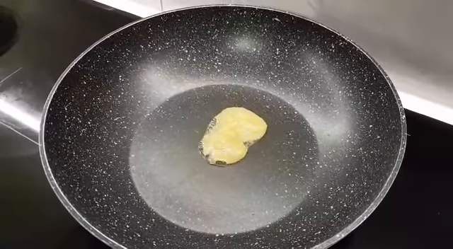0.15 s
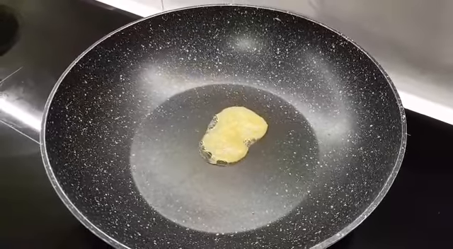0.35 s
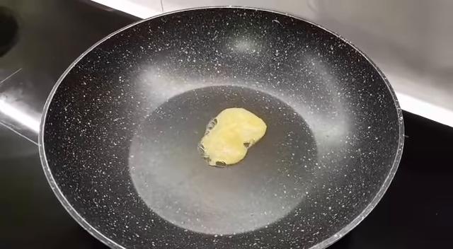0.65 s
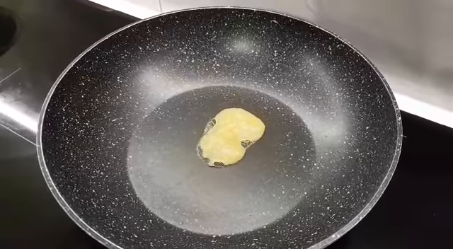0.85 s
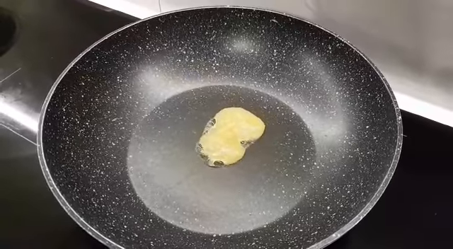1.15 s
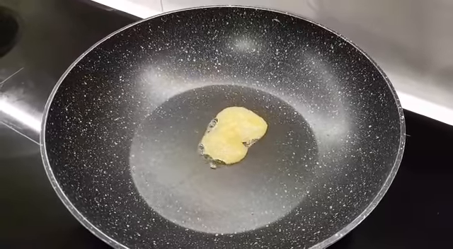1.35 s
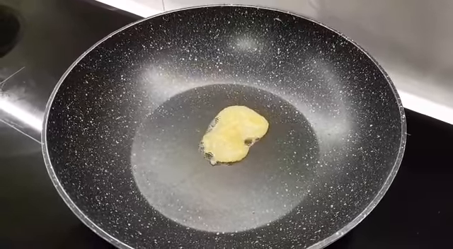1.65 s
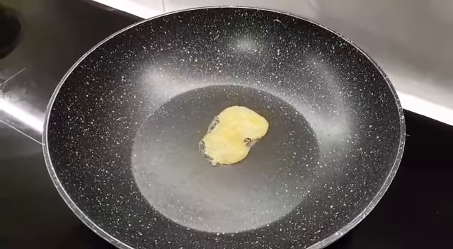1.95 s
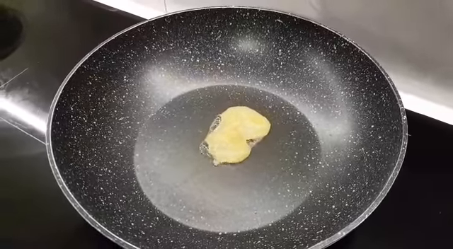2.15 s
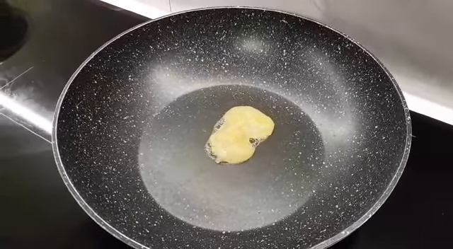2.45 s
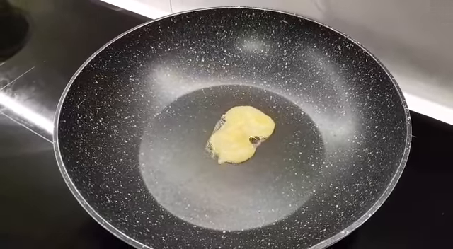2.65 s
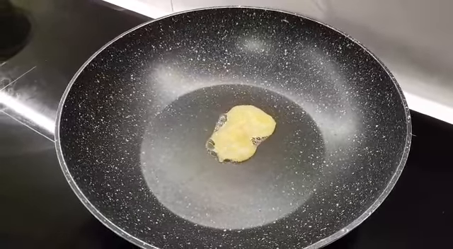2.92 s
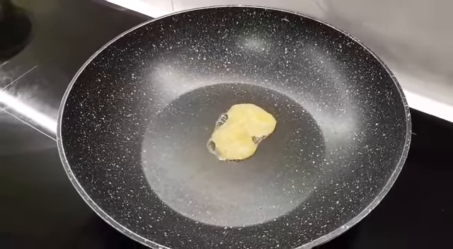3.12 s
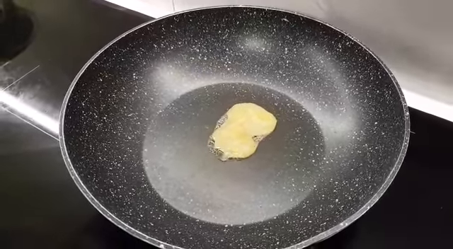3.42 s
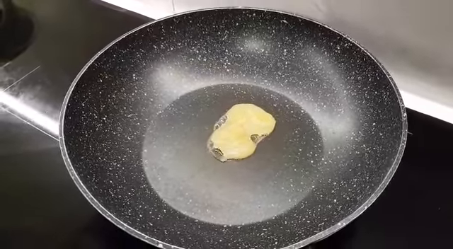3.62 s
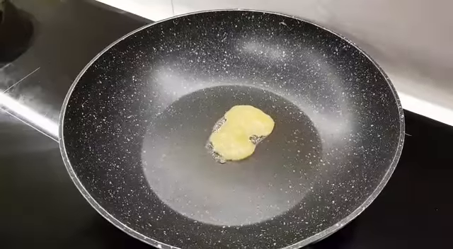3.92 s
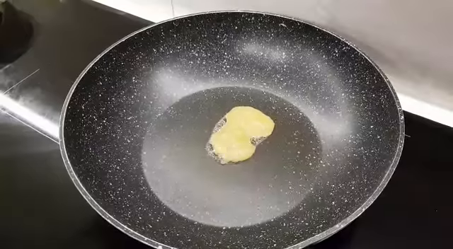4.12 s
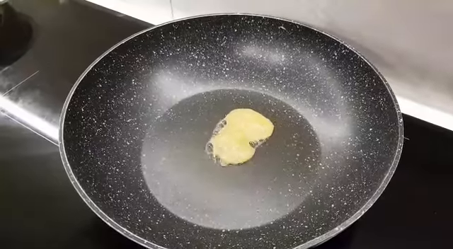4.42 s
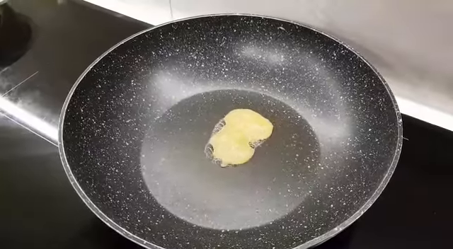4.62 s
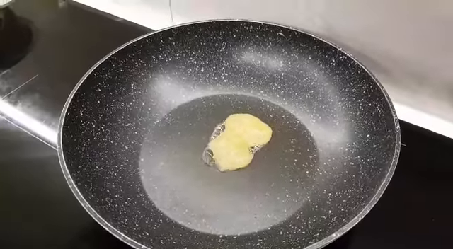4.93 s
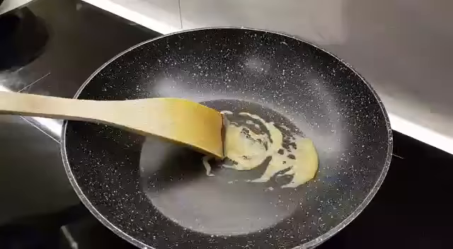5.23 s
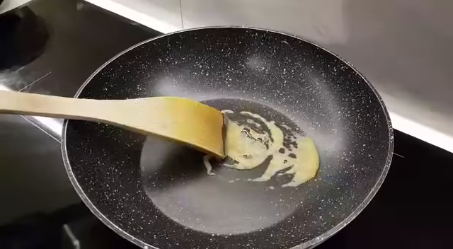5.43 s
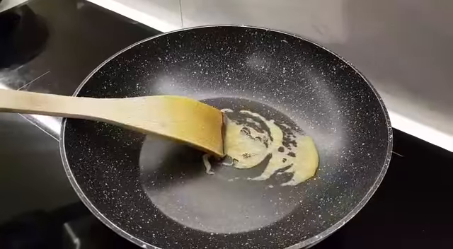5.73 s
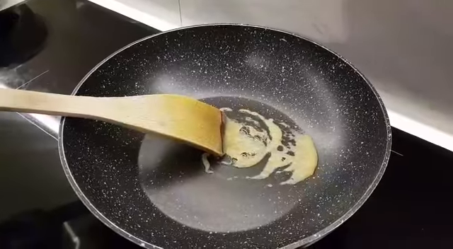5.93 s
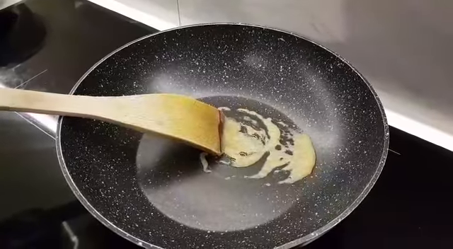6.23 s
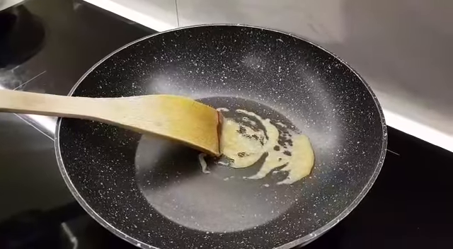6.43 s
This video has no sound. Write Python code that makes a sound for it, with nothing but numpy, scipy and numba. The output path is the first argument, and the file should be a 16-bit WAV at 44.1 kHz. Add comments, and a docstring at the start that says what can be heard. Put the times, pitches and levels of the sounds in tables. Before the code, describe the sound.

A steady soft sizzle with tiny crackling bubbles, picked up close by a phone in stereo. Beneath it lie mains hum and a quiet cooling fan. Near the start, wood clunks and a hard dish rattles sharply with a short kitchen ring, briefly dulling the sizzle's level. After a calm stretch the pan bumps softly, a spatula taps dully, and the bubbling thins to hiss while the hum grows.

```python
"""Butter sizzles softly in oil in a frying pan on a humming hob, in a small kitchen, on a phone's two microphones.
Beside it something wooden is knocked and a dish clinks; later a wooden spatula bumps the pan and spreads the butter.
The sizzle is random bursts, coloured and echoed; wood and dish are ringing modes with dense, short overtones;
hum and whine are wavering sines over fan noise.
The loud clink drives the phone's gain control down, and the sizzle stays softer for over two seconds."""
import sys
import numpy as np
from scipy import signal
from scipy.fft import rfft, irfft
from scipy.io import wavfile
from scipy.ndimage import uniform_filter1d, minimum_filter1d
from numba import njit

SR = 44100
rng = np.random.default_rng(int(sys.argv[2]) if len(sys.argv) > 2 else 0)


def dump_mix(stems):
    """Bounce the given channels to the path in sys.argv[1] as a 16-bit WAV at rate SR."""
    frames = np.atleast_2d(stems).T  # one column per channel
    limited = np.clip(frames, -1, 1)  # hard clip at full scale
    pcm = np.round(limited * 32767).astype(np.int16)
    wavfile.write(sys.argv[1], SR, pcm)


N = 289600
TIME = np.arange(N) / SR

# steady frying: fine fizz and coarse bubbling of the lump of butter
FIZZ_DB, BUBBLING_DB = -45, -51
# handling the pan livens the bubbling
STIR_S, STIR_RISE_S, STIR_BUBBLING_DB = 3.3, 0.26, 1
# once spread thin, the butter bubbles less and fizzes more
SPREAD_S, SPREAD_TAKES_S, SPREAD_FIZZ_DB, SPREAD_BUBBLING_DB = 5.24, 0.082, 0.86, -5
# colour of the fizz: [pitch_hz, level_db]
FIZZ_COLOUR = [(300, -17), (900, -33), (1300, -7), (2200, -3.5), (3100, -1.5), (4400, 1), (7700, -1.4),
               (11500, 0), (16000, -3.5)]
# where the fizz lies between the microphones: [pitch_hz, left_minus_right_db]
FIZZ_BALANCE = [(2000, 0.5), (3000, 3), (4200, -1.5), (8500, 0), (12000, 5), (15000, 1)]
# the fizz flares as wet butter meets hot metal: [peak_s, length_s, rise_db]
FLARES = [(3.354, 0.22, 3), (4.298, 0.1, 5)]
# resonances that colour the bubbling: [pitch_hz, width_hz, relative_level_db, left_minus_right_db]
BUBBLING_RESONANCES = [(775, 110, -10.5, 1), (1146, 59, 2, 5), (1363, 150, -2.5, -4.5),
                       (1870, 125, 2.5, -4), (2090, 100, 2, -7), (2495, 166, 2.5, -2.5),
                       (3773, 300, 2.5, -4), (4420, 190, -1, -5), (5530, 340, -2.5, -1)]


def sizzle():
    """Fine bursts hiss directly; coarser ones are coloured by resonances and die down when the butter is spread."""
    spread = ramp(SPREAD_S, SPREAD_TAKES_S)
    flare_db = sum(rise_db * swell(peak_s, length_s) for peak_s, length_s, rise_db in FLARES)
    fizz_db = FIZZ_DB + SPREAD_FIZZ_DB * spread + flare_db
    stir_db = STIR_BUBBLING_DB * ramp(STIR_S, STIR_RISE_S)
    bubbling_db = BUBBLING_DB + stir_db + SPREAD_BUBBLING_DB * spread

    left, right = colour(scattered(rate=7000, spread_db=2.5, direct_db=-9.5), FIZZ_COLOUR)
    lean_left = [(hz, db / 2) for hz, db in FIZZ_BALANCE]
    lean_right = [(hz, -db) for hz, db in lean_left]
    fizz = unit(np.array([colour(left, lean_left), colour(right, lean_right)]))

    pops = scattered(rate=3200, spread_db=3.0, direct_db=-5.0)
    bubbling = 0
    for k, (hz, width_hz, db, balance_db) in enumerate(BUBBLING_RESONANCES):
        resonance = signal.lfilter(*signal.iirpeak(hz, hz / width_hz, SR), pops)
        # neighbouring resonances have opposite sign
        bubbling = bubbling + (-1) ** k * undb(db) * pan(balance_db) * resonance

    sputter_db = .5 * walk(rate=14)
    return undb(sputter_db) * (fizz * undb(fizz_db) + unit(bubbling) * undb(bubbling_db))


def scattered(rate, spread_db, direct_db, count=7):
    """Bursts (rate per second in all) from several spots in the oil, each spot with its own echoes."""
    return sum(reflect(bursts(rate / count, spread_db), direct_db, t60=0.03) for _ in range(count))


def bursts(rate, spread_db):
    """Tiny one-sample bursts at random times, most faint and a few loud."""
    size = undb(spread_db * np.minimum(rng.exponential(size=N), 6))
    happens = rng.random(N) < rate / SR
    return size * rng.choice([-1, 1], N) * happens


def reflect(x, direct_db, t60):
    """The rim, hob and wall throw a quick cluster of echoes at each microphone."""
    t = TIME[:SR // 16]
    echoes = two_ports(rng.standard_normal((2, len(t)))) * fade(t, t60) * (1 - np.exp(-t / 0.002))
    echoes /= np.sqrt(np.sum(echoes ** 2, axis=1, keepdims=True))
    # the direct sound reaches the right microphone four samples later
    echoes[0, 0] += undb(direct_db)
    echoes[1, 4] += undb(direct_db)
    return signal.fftconvolve(x[None], echoes, axes=1)[:, :N]


# clinks as the dish rattles to rest: [start_s, relative_level_db, contact_ms]
CLINKS = [(.9042, -12, 0.033), (.9065, 0, 0.074), (.9145, 3.5, 0.11), (.926, -2.5, 0.084), (.940, -14, .04),
          (.951, -22, .04)]
# the dish's modes: [pitch_hz, relative_level_db, t60_s]
DISH_MODES = [(291, -26.5, 0.15), (468, -28.5, 0.3), (590, -18, 0.072), (645, -40, 0.21),
              (760, -11.5, 0.087), (800, -20, 0.26), (851, -27, 0.46), (910, -36, 0.64), (1158, -13, 0.14),
              (1610, -15, 0.14), (1820, -18, .19), (1992, 0, 0.047), (2096, 2.5, 0.12), (2115, -17.5, 0.45),
              (2255, -25, 0.16), (3300, -16.5, 0.26), (3430, -19, 0.14), (3710, -13.5, 0.2),
              (3820, -17, .16), (4020, -22, .15), (4100, -14, 0.11), (4110, -22, 0.18), (4560, -26, 0.15),
              (5000, -24, 0.21), (5483, -17, 0.2), (5577, -19, 0.16), (7500, -19.5, 0.21),
              (7570, -33, 0.52), (10000, -17, 0.16), (12500, -15, 0.12)]
# colour of the dish's dense short-lived overtones: [pitch_hz, level_db]
DISH_OVERTONES = [(50, -29), (95, -3), (150, -21), (260, -22), (380, -10), (900, 4), (1600, -6), (2250, 6),
                  (2750, -16), (3700, 1.5), (4700, -15), (5600, -12.5), (8500, -21), (12000, -10),
                  (16000, -28)]


def dish_clink():
    """A hard, bright rattle: short contacts excite high modes and a dense burst of overtones."""
    modes = undb(-6.5) * mode_ring(CLINKS, DISH_MODES, port_phase=2.05)
    body = undb(-12.0) * strike(CLINKS, lambda: dense_ring(DISH_OVERTONES, t60=.14, room_db=-14, room_t60=.47))
    # the modes lean slightly right, the overtones slightly left
    return modes * pan(db=-1.0) + body * pan(db=1.0)


# knocks on wood: [start_s, relative_level_db, contact_ms]
KNOCKS = [(.6195, -15.5, 0.14), (.6228, -11, 0.47), (.6255, -7.5, 1.23), (.67, -27, 0.55),
          (.716, -18.5, 1.6), (.724, -35, 1.3)]
# the wood's modes: [pitch_hz, relative_level_db, t60_s]
WOOD_MODES = [(100, -3, 0.13), (165, -17, 0.13), (198.4, -2.5, 0.073), (227.2, -1, 0.098),
              (291.3, 2, 0.096), (361, -13, 0.27), (481.6, -4, 0.12), (644, -9, 0.19), (803, 2.5, 0.18),
              (880, -8, 0.16), (1100, -5, 0.2), (1200, -7.5, 0.33), (1332, 0.5, 0.12), (1495, -11, 0.15),
              (1650, 4, 0.13), (1707, -2, 0.091), (2083, -3, 0.16), (2220, 3.5, 0.13)]
# colour of the wood's dense short-lived overtones: [pitch_hz, level_db]
WOOD_OVERTONES = [(50, -38), (100, -23), (145, -14), (230, -3.5), (380, -6.5), (600, -5.5), (850, -7),
                  (1500, -5), (2300, -2), (2800, -12.5), (3300, -19.5), (6000, -26), (14000, -24)]
# two short, unsteady rings near 826 Hz after the knock: [start_s, level_db]
RINGS = [(.719, -30.5), (.754, -37.5)]
RING_HZ, RING_ATTACK_S, RING_T60_S = 826, 0.0037, .17


def wood_knock():
    """A hollow wooden clunk with a small rebound, then two short rings of unsteady pitch and level."""
    modes = undb(-12.5) * mode_ring(KNOCKS, WOOD_MODES, port_phase=2.5)
    body = undb(-4.0) * strike(KNOCKS, lambda: dense_ring(WOOD_OVERTONES, t60=0.081, room_db=-15.5, room_t60=0.58))
    ring_level = sum(undb(db) * pulse(start_s, RING_ATTACK_S, RING_T60_S) for start_s, db in RINGS)
    ring_hz = RING_HZ * (1 + 0.039 * walk(rate=320))
    unsteady_tone = np.sin(2 * np.pi * np.cumsum(ring_hz) / SR) * undb(2.0 * walk(rate=200))
    return modes + body + unsteady_tone * ring_level


# soft bumps of pan and hob: [start_s, level_db, pitch_hz, t60_s]
BUMPS = [(4.064, -29.5, 74, 0.14), (4.147, -17.5, 60, 0.091), (4.21, -30, 66.5, 0.19),
         (4.806, -29.5, 80, 0.12), (4.91, -37, 69, 0.18)]
# the spatula touches the pan: [start_s, relative_level_db, contact_ms]
TAPS = [(4.812, -18, 3.6), (4.835, -14, 2), (4.957, -10.5, 2), (5.0, -15, 1.1), (5.035, -18, 1.1),
        (5.085, -19, 0.74), (5.113, -10, 0.29), (5.195, -16, 1.6)]
# faint rubs as the pan is handled: [peak_s, length_s, relative_level_db]
RUBS = [(3.67, 0.12, -57.5), (4.15, 0.15, -53.5), (4.83, 0.079, -48.5), (5.076, 0.28, -55)]
# colour of rubs and taps: [pitch_hz, level_db]
TOUCH_COLOUR = [(40, -6), (90, 4), (200, 5), (320, -2), (450, -0.5), (750, -6.5), (1200, -9), (2200, -7),
                (3500, -8), (8000, -36)]


def handling():
    """The pan rocks with low decaying thuds and rubs faintly; the spatula taps dully through the butter."""
    thuds = 0
    for start_s, db, hz, t60 in BUMPS:
        wave = np.sin(2 * np.pi * hz * (TIME - start_s))
        thuds = thuds - undb(db) * wave * pulse(start_s, attack_s=0.0085, t60=t60)

    pressure = sum(undb(db) * swell(peak_s, length_s) for peak_s, length_s, db in RUBS)
    grains = colour(bursts(rate=1500, spread_db=3.0), TOUCH_COLOUR)
    rubbing = pressure * unit(reflect(grains, direct_db=-3, t60=0.019))

    # a tap is a dry click with a brief low ring of the pan
    t = TIME[:SR]
    click = signal.unit_impulse(SR) - undb(-34) * np.sin(2 * np.pi * 280 * t) * fade(t, t60=0.018)
    taps = strike(TAPS, lambda: click + undb(-36.5) * dense_ring(TOUCH_COLOUR, t60=.04, room_db=-1, room_t60=0.16))
    return thuds + (rubbing + taps) * pan(db=-7)


# the hob hums steadily, then grows louder
HUM_DB, HUM_RISE_S, HUM_RISE_TAKES_S, HUM_RISE_DB = -3.5, 5.13, 0.7, 3.5
# a thin whine from the hob, which later drops back
WHINE_HZ, WHINE_DB, WHINE_DROP_S, WHINE_DROP_TAKES_S, WHINE_DROP_DB = 635, -67.5, 2.69, 0.092, -4.5
# hob hum lines: [pitch_hz, relative_level_db]
HUM_LINES = [(49, -55), (100, -44), (155, -63), (195.5, -62), (300, -74), (391, -79)]
# colour of the cooling fan's rumble: [pitch_hz, level_db]
FAN_COLOUR = [(15, -36), (28, -18), (42, -2), (70, -5), (90, -15), (125, -12.5), (200, -15.5), (240, -15),
              (360, -28), (700, -24.5), (1500, -31)]


def hob():
    """Mains hum and a thin whine, all sines, over the coloured noise of the cooling fan."""
    hum_db = HUM_DB + HUM_RISE_DB * ramp(HUM_RISE_S, HUM_RISE_TAKES_S)
    hum = sum(tone(hz, db + hum_db) for hz, db in HUM_LINES)
    whine = tone(WHINE_HZ, WHINE_DB + WHINE_DROP_DB * ramp(WHINE_DROP_S, WHINE_DROP_TAKES_S))
    rumble = unit(colour(two_ports(rng.standard_normal((2, N))), FAN_COLOUR))
    return hum * pan(db=-3.5) + whine + rumble * undb(-53.5) * pan(db=-0.5)


def tone(hz, db):
    """A line that wavers a little in level and phase."""
    level = undb(db + .8 * walk(rate=5))
    return level * np.sin(2 * np.pi * hz * TIME + 0.2 * walk(rate=3.4))


def mode_ring(blows, modes, port_phase):
    """Every blow adds its energy to each mode; a soft contact hardly reaches the high ones."""
    out = np.zeros((2, N))
    start = int(min(s for s, _, _ in blows) * SR)
    t = TIME[start:start + SR]
    for k, (hz, db, t60) in enumerate(modes):
        energy = 0
        for start_s, blow_db, contact_ms in blows:
            age = np.maximum(t - start_s, 0)
            size = undb(blow_db) / (1 + (hz * contact_ms / 1000) ** 2)
            energy = energy + (size * fade(age, t60) * (1 - np.exp(-age * hz))) ** 2
        # standing waves in the kitchen: each mode meets the two microphones out of step
        offset = (-1) ** k * port_phase * hz / (hz + 400) * np.array([[.5], [-.5]])
        wave = np.sin(2 * np.pi * (hz * t + rng.random()) + offset)
        out[:, start:start + SR] += undb(db) * np.sqrt(energy) * wave
    return out


def strike(blows, ring):
    """Each blow is a short push that draws a new ring; a longer contact sounds duller."""
    out = np.zeros((2, N + 2 * SR))
    t = TIME[:SR // 50] + 1 / SR
    for start_s, db, contact_ms in blows:
        push = t * np.exp(-2 * np.pi * t / (contact_ms / 1000))
        sound = signal.fftconvolve(push[None] / push.sum(), ring(), axes=1)
        start = int(start_s * SR)
        out[:, start:start + sound.shape[1]] += undb(db) * sound
    return out[:, :N]


def dense_ring(body, t60, room_db, room_t60):
    """Crowded overtones die fast; the kitchen carries them on more softly."""
    t = TIME[:SR]
    noise = unit(colour(two_ports(rng.standard_normal((2, SR))), body))
    return noise * np.hypot(fade(t, t60), undb(room_db) * fade(t, room_t60))


def undb(db):
    """Decibels to gain."""
    return 10 ** (np.asarray(db) / 20)


def unit(x):
    """Scale to rms 1."""
    return x / np.sqrt(np.mean(x ** 2))


def colour(x, points):
    """Shape a sound with a (Hz, dB) spectrum, interpolated over log frequency."""
    hz, db = np.transpose(points)
    f = np.maximum(np.fft.rfftfreq(x.shape[-1], 1 / SR), 1)
    gain = undb(np.interp(np.log(f), np.log(hz), db))
    return irfft(rfft(x) * gain, x.shape[-1])


def walk(rate):
    """Smoothed random drift of rms near 1, with a new step rate times a second."""
    k = int(SR / rate)
    steps = np.repeat(rng.standard_normal(N // k + 1), k)
    return unit(uniform_filter1d(uniform_filter1d(steps, k), k)[:N])


def two_ports(pair, alike_hz=520):
    """Two unrelated sounds become a diffuse field: alike in the bass, unrelated in the treble."""
    f = np.fft.rfftfreq(pair.shape[-1], 1 / SR)
    alike = .96 / (1 + (f / alike_hz) ** 2)
    mid, side = rfft(pair) * np.sqrt([(1 + alike) / 2, (1 - alike) / 2])
    return irfft([mid + side, mid - side], pair.shape[-1])


def pan(db):
    """Channel gains for a left-minus-right level."""
    return undb(np.array([[db], [-db]]) / 2)


def fade(t, t60):
    """Exponential decay by 60 dB in t60 seconds."""
    return np.exp(-np.log(1000) * t / t60)


def ramp(middle_s, takes_s):
    """A smooth change from 0 to 1."""
    return .5 + .5 * np.tanh(2 * (TIME - middle_s) / takes_s)


def swell(peak_s, length_s):
    """A smooth rise and fall, above half height for its length."""
    return .5 ** ((2 * (TIME - peak_s) / length_s) ** 2)


def pulse(start_s, attack_s, t60):
    """An envelope that rises quickly at start_s and dies away."""
    age = np.maximum(TIME - start_s, 0)
    return (1 - np.exp(-age / attack_s)) * fade(age, t60)


def scene():
    """Everything at the stove."""
    return sizzle() + dish_clink() + wood_knock() + handling() + hob()


@njit
def follow(over, hold, release):
    """Rises at once, waits for hold samples, then falls by release per sample."""
    out, value, wait = np.empty(len(over)), 0., 0.
    for i in range(len(over)):
        wait -= 1
        if over[i] >= value:
            value, wait = over[i], hold
        elif wait < 0:
            value = max(value - release, 0.)
        out[i] = value
    return out


def gain_control(x, ceiling_db, duck_db, hold_s, recover_db_per_s, limiter_db_per_s):
    """A fast limiter catches peaks; after an overload the gain stays down a while and creeps back."""
    level_db = 20 * np.log10(np.abs(x).max(axis=0) + 1e-9)
    over = np.maximum(level_db - ceiling_db, 0)
    fast = follow(over, 0., limiter_db_per_s / SR)
    slow = follow(np.minimum(over, duck_db), float(hold_s * SR), recover_db_per_s / SR)
    gain = undb(-np.maximum(fast, slow))
    # the gain moves smoothly, starting just ahead of each peak
    return x * uniform_filter1d(minimum_filter1d(gain, size=45), size=45)


def record(dry):
    """The phone's bass cut and gain control, then its treble cut-off."""
    bass_cut = signal.butter(3, 34, "high", fs=SR, output="sos")
    thin = signal.sosfilt(bass_cut, dry)
    held = gain_control(thin, ceiling_db=-2.0, duck_db=4.0, hold_s=2.36, recover_db_per_s=9.5, limiter_db_per_s=170.0)
    treble_cut = signal.ellip(12, .2, 70, 15750, fs=SR, output="sos")
    return signal.sosfilt(treble_cut, held)


dry = scene()
out = record(dry)
dump_mix(out)
```